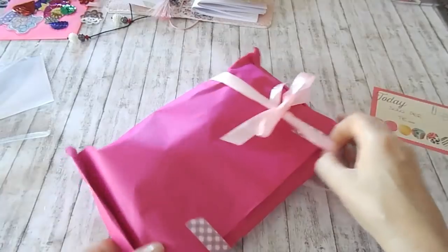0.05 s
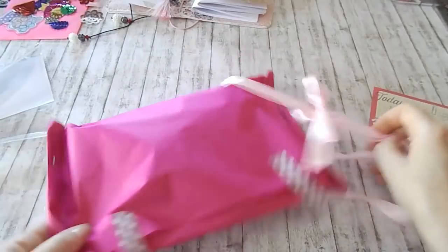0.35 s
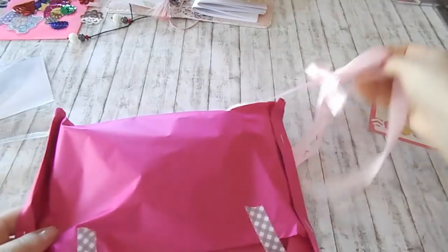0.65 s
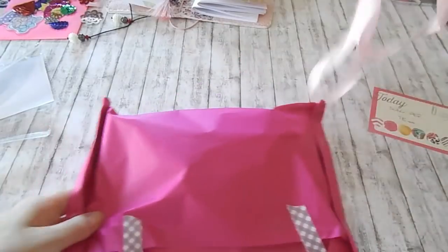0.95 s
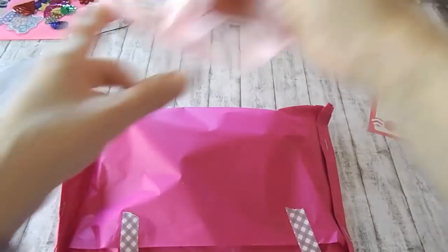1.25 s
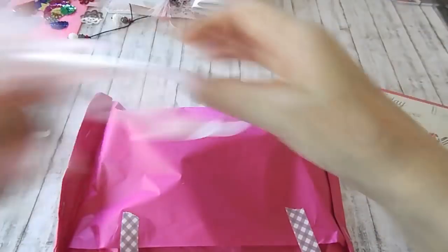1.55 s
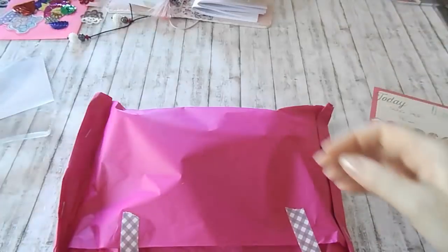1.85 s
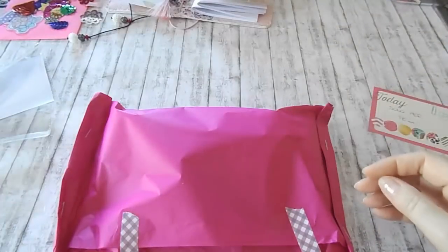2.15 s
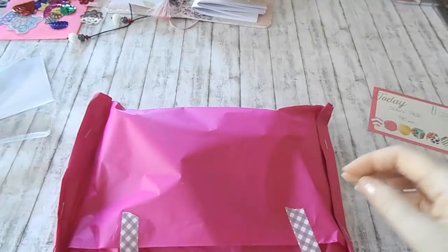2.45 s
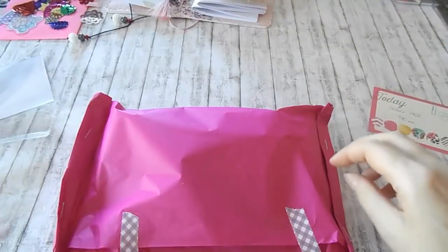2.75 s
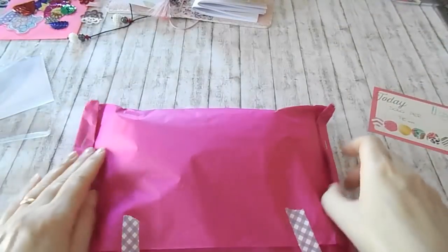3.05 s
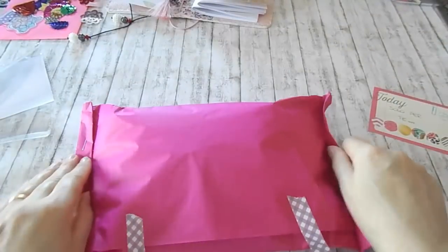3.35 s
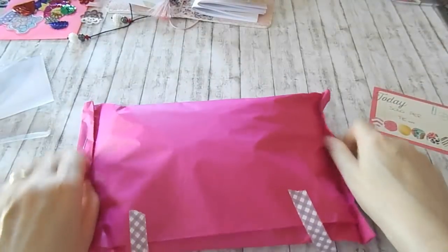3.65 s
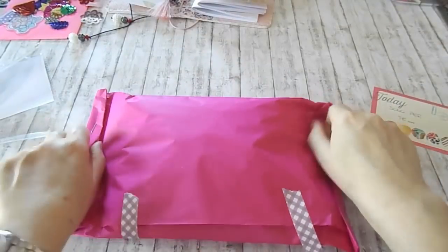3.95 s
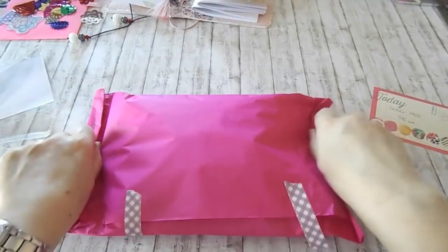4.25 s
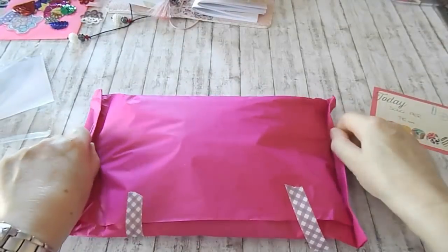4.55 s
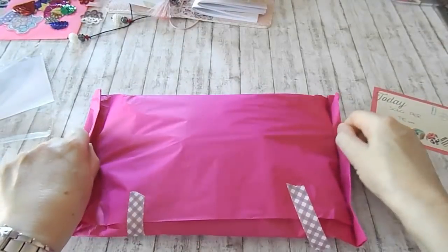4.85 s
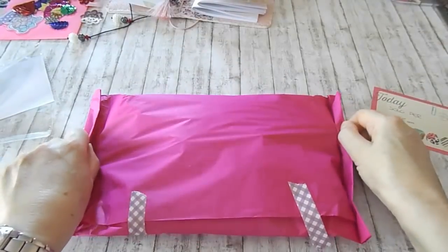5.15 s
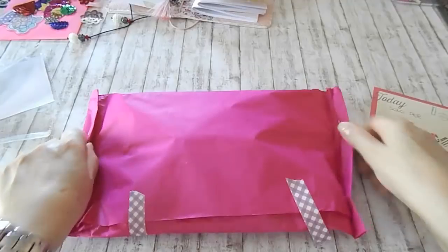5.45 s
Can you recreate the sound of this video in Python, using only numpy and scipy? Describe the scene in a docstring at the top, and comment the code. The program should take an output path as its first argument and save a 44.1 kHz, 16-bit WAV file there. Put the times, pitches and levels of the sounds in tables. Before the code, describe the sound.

A ribbon drags off a rustling paper parcel, then a pause, more crinkling and one loud, sharp snap in a quiet room.

```python
"""Thin, stiff wrapping paper crackles as a ribbon is pulled off a parcel; after a lull, fingers
pick at the taped end until it snaps open. The ribbon drags in tiny slips, the paper buckles in
clusters of crackles and pops, and fingers brush the table and press the parcel against it.
A small quiet room, one microphone close above the table; the placement colours the paper's sound."""
import sys
import numpy as np
from scipy import signal
from scipy.fft import rfft, irfft
from scipy.io import wavfile
from scipy.ndimage import uniform_filter1d

SR = 44100
rng = np.random.default_rng(int(sys.argv[2]) if len(sys.argv) > 2 else 0)


def generate_wav(signal):
    """Clip the signal to [-1, 1] and save it as 16-bit WAV at the path in sys.argv[1]."""
    frames = np.transpose(np.atleast_2d(signal))
    scaled = np.clip(frames, -1, 1) * 32767
    pcm = np.round(scaled).astype(np.int16)
    wavfile.write(sys.argv[1], SR, pcm)


N = 251370
TIME = np.arange(N) / SR
TOP_HZ = 15900

# pulls that drag the ribbon off and gather it: (time [s], length [s], level [dB], body [dB], sheen [dB])
RIBBON_PULLS = [(-.04, 0.11, -38.5, -1.5, 1), (.025, 0.19, -35, -1.5, 2), (.26, 0.14, -36.5, -2.5, -3),
                (.47, 0.14, -45, -2, 3.5), (.655, 0.11, -47, -1, 8), (.735, 0.16, -43.5, -1, 3.5),
                (.935, 0.084, -39, -3.5, -2.5), (1.23, 0.26, -53, -21, 3.5)]
# the loudest creases popping through: (time [s], energy over one millisecond [dB], pitch [Hz])
LOUD_CREASES = [(.176, -28.5, 4120), (.4629, -27.5, 2600), (.4824, -28.5, 2400), (.5282, -30.5, 3840),
                (.5776, -32.5, 3000), (.96, -33, 4260), (1.059, -30, 2300), (1.6919, -46.5, 6100),
                (1.8022, -48, 5600), (2.9125, -35.5, 7000), (2.9723, -28, 8000), (3.0491, -18, 9000),
                (3.1111, -26, 6300), (3.1736, -23, 7000), (3.2512, -25.5, 3780), (3.3209, -30, 3920),
                (3.3517, -27.5, 9400), (3.6264, -25.5, 2530), (3.6843, -19.5, 6600), (3.7893, -25, 5200),
                (3.8279, -18.5, 8000), (3.9663, -22, 8100), (4.0303, -20, 7400), (4.0821, -25, 7360),
                (4.1989, -18.5, 9200), (4.2319, -23, 9700), (4.281, -25, 5100), (4.3028, -24.5, 11000),
                (4.3736, -25.5, 5500), (4.4887, -27, 4700), (4.5137, -29, 4100), (4.5543, -27, 2930),
                (4.6182, -29.5, 3650), (4.6343, -26.5, 2640), (4.684, -25, 6550), (4.6864, -15, 2700),
                (4.9721, -32.5, 5500), (5.195, -17.5, 2100), (5.199, -5, 6800), (5.2096, -17, 3000),
                (5.2126, -15, 5500), (5.3621, -28.5, 9300), (5.4962, -32, 4100), (5.5633, -26, 9100),
                (5.5871, -27, 9300), (5.692, -32, 5900)]
# broad panels flipping with a hollow pop: (time [s], level [dB], ring [Hz], t60 [s])
PANEL_FLIPS = [(0.4623, -31, 1770, 0.0059), (1.0585, -32, 1880, .006), (3.049, -34, 800, .016),
               (3.279, -36, 895, .02), (3.445, -38.5, 870, .014), (3.625, -33, 2290, .012),
               (4.082, -36, 840, .012), (4.554, -32.5, 1010, .01), (4.653, -34, 810, .009),
               (4.686, -17.5, 2280, .01), (5.1987, -3.5, 1060, 0.0036), (5.2122, -16.5, 870, 0.012)]
# fingers brushing over the table: (time [s], level [dB])
BRUSH_ENVELOPE = [(2.505, -88), (2.52, -51), (2.56, -50), (2.61, -57), (2.7, -74)]
# tugs that crumple the wrapping: (time [s], length [s], level [dB], body [dB], crispness [dB])
PAPER_TUGS = [(2.91, 0.15, -37, 2.5, -2), (3.015, 0.087, -33.5, -3, 0), (3.12, 0.099, -43, -1, 7),
              (3.225, 0.11, -34, -1.5, -4), (3.355, 0.11, -36.5, 1, -2), (3.555, 0.027, -39.5, -7, -11),
              (3.6, 0.08, -38.5, -3, 1), (3.78, 0.052, -36, 4.5, -1), (3.893, 0.059, -36.5, -1.5, 0.5),
              (4.068, 0.022, -39, 1, 1), (4.11, 0.053, -45, -3, 4.5), (4.175, .035, -35, -0.5, 0),
              (4.255, 0.075, -33.5, -1, -3.5), (4.36, .02, -41, 2, 4), (4.41, 0.037, -35, -0.5, -3.5),
              (4.503, 0.0095, -42.5, 2, -5), (4.575, 0.1, -44.5, 0, -5.5), (4.812, 0.077, -40, -1.5, -2.5),
              (4.995, 0.031, -46.5, 4, -7), (5.062, 0.028, -37.5, -4.5, -7), (5.26, 0.11, -37.5, 0, -1),
              (5.425, 0.064, -40.5, -3.5, -2), (5.544, 0.017, -32.5, -1.5, -0.5), (5.59, 0.093, -46, -3, 2)]
# fingers pressing the parcel against the table: (time [s], level [dB], t60 [s])
FINGER_PRESSES = [(2.93, -74, .5), (3.04, -73, .7), (3.24, -75, .7), (3.79, -74, .25), (3.955, -71, .1),
                  (4.16, -81, .5), (4.28, -75, .3)]
# the flap jerking loose: (time [s], level [dB], rise [s], t60 [s], ring [Hz], ring [dB], air puff [dB])
FLAP_SNAPS = [(4.6825, -23.5, 0.0026, 0.2, 2290, -2.5, -64), (5.1933, -22.5, .00062, 0.018, 2080, 7, -56),
              (5.1988, -20, 0.00059, 0.24, 2040, -4, -34), (5.2082, -14.5, .0033, 0.069, 1900, -4, -46)]
# narrow peaks from room, table and microphone placement: (frequency [Hz], width [Hz], gain [dB])
ROOM_TABLE_PEAKS = [(500, 28, -7.5), (633, 31, -10.5), (826, 30, -6), (1030, 24, -18), (1128, 24, -30),
                    (1240, 12, -13), (1340, 64, -13.5), (2080, 52, -19.5), (2700, 54, -19)]
# tone colour of ribbon, room air, finger brush, paper and flap: (frequency [Hz], gain [dB])
RIBBON_EQ = [(71, -70), (120, -31), (157, -8), (188, -23.5), (327, -12.5), (362, -10), (546, -10),
             (949, 0.5), (1320, -4.5), (2930, -1.5), (4590, -4.5), (8480, -5), (15000, -7), (16000, -21)]
ROOM_EQ = [(18, -63), (30, -38), (86, -17.5), (134, -25), (157, -15.5), (189, -12.5), (295, -8.5),
           (364, -8), (616, -2.5), (721, -4.5), (1100, -1.5), (1350, -10.5), (1630, -10), (1760, -14),
           (16000, -22.5)]
BRUSH_EQ = [(200, -18), (900, 12), (1600, 2.5), (3200, 3), (6000, 1), (10000, -5), (16000, -13)]
PAPER_EQ = [(59, -74), (100, -32), (185, -29), (266, -18.5), (415, -13), (452, -12), (535, -11), (836, 0),
            (1230, -3), (2860, -1.5), (4380, -4.5), (5900, -4), (14700, -6.5), (16000, -12)]
SNAP_EQ = [(100, -36), (250, -24), (380, -9.5), (600, -4), (1000, 0.5), (2500, -18.5), (4500, -4),
           (6500, -2), (12000, -4.5), (16000, -8)]


def undb(db):
    """Decibels to gain."""
    return 10 ** (np.asarray(db) / 20)


def unit(x):
    """Scale to rms 1."""
    return x / np.sqrt(np.mean(x ** 2))


def add(out, s, x):
    """Mix x into out from time s on."""
    i = int(s * SR)
    out[i:i + len(x)] += x[:N - i]


def fade(t, t60):
    """Exponential decay by 60 dB in t60."""
    return np.exp(-np.log(1000) * t / t60)


def band(x, hz, width_hz, passes=1):
    """Two-pole resonance with gain 1 at its centre; more passes steepen the skirts."""
    w = 2 * np.pi * min(hz, SR * .45) / SR
    a = np.sin(w) * width_hz / hz / 2
    for _ in range(passes):
        x = signal.lfilter([a, 0, -a], [1 + a, -2 * np.cos(w), 1 - a], x)
    return x


def colour(x, eq, size=2048):
    """Minimum-phase EQ, so that attacks stay sharp."""
    hz, db = np.transpose(eq)
    bins_hz = np.maximum(np.arange(size // 2 + 1) * SR / size, 1)
    gain = undb(np.interp(np.log(bins_hz), np.log(hz), db))
    cepstrum = irfft(np.log(gain))
    cepstrum[1:size // 2] *= 2
    cepstrum[size // 2 + 1:] = 0
    return signal.fftconvolve(x, irfft(np.exp(rfft(cepstrum))))[:len(x)]


def diffuse(x, t60, delay_s, dull_hz, size=22050):
    """A dense reverb tail that starts after a delay and is softer in the treble."""
    t = np.arange(size) / SR
    tail = rng.standard_normal(size) * fade(t, t60) * (t > delay_s)
    tail = signal.lfilter(*signal.butter(1, dull_hz, fs=SR), tail / np.linalg.norm(tail))
    return signal.fftconvolve(x, tail)[:N]


def wander(rate_hz):
    """Glides from one random value to the next; spread near 1."""
    hold = int(SR / rate_hz)
    steps = np.repeat(rng.standard_normal(N // hold + 1), hold)[:N]
    return np.sqrt(3 / 2) * uniform_filter1d(steps, hold)


def stroke(s, length_s, attack_s, release_t60, sag_db_per_s=0):
    """Envelope of one hand move: it takes hold, eases off while it lasts, and lets go."""
    out, live = np.zeros(N), (TIME > s) & (TIME < s + 1)
    t = TIME[live] - s
    sag = undb(-sag_db_per_s * np.minimum(t, length_s))
    release = fade(np.maximum(t - length_s, 0), release_t60)
    out[live] = np.minimum(t / attack_s, 1) * sag * release
    return out


def hand_motion(moves, swell_share, release_t60, sag_db_per_s, rest=0):
    """Level, body and top curves in dB; long moves swell more slowly, the strongest sets the colour."""
    power = np.array([stroke(s, length_s, swell_share * length_s, release_t60, sag_db_per_s) * undb(db)
                      for s, length_s, db, _, _ in moves]) ** 2
    total = power.sum(0) + rest ** 2 + 1e-14
    body_db, top_db = np.transpose(moves)[-2:] @ power / total
    return 10 * np.log10(total), body_db, top_db


def crackle(per_s, spread_db, cluster_db, cluster_hz, octaves, rub_db=-0.5, window=2200):
    """Clusters of tiny slips, each with its own size and pitch, over smooth rubbing; level held even."""
    chance, strength, pitch, sign = rng.random((4, N))
    size_db = -spread_db * np.log(np.maximum(strength, .04))
    slips = (chance < per_s / SR) * undb(size_db) * np.sign(sign - .5)
    centres_hz = np.geomspace(250, 15000, 11)
    slip_octave = np.log2(centres_hz[0]) + pitch * np.log2(TOP_HZ * 2 / centres_hz[0])
    ticks = np.zeros(N)
    for hz in centres_hz:
        share = np.exp(-.5 * ((slip_octave - np.log2(hz)) / octaves) ** 2)
        ticks += band(slips * share * rng.choice([-1, 1], N), hz, hz, passes=2)
    rubbing = undb(rub_db) * rng.standard_normal(N)
    texture = (unit(ticks) + rubbing) * undb(cluster_db * wander(cluster_hz))
    local_power = uniform_filter1d(uniform_filter1d(texture ** 2, window), window)
    return texture / np.sqrt(local_power)


def rustle(slips, eq, motion, body_hz, crisp_hz):
    """Slips played by a hand: pressing brings out the body, light contact the top."""
    level_db, body_db, top_db = motion
    full = unit(colour(slips, eq))
    body = signal.sosfiltfilt(signal.butter(2, body_hz, fs=SR, output="sos"), full)
    top = signal.sosfiltfilt(signal.butter(2, crisp_hz, "high", fs=SR, output="sos"), full)
    mids = full - body - top
    return undb(level_db) * (mids + body * undb(body_db) + top * undb(top_db))


def ribbon(pulling, zip_hz=3100, zip_width_hz=1700):
    """Satin slides over paper in tiny slips, and zips taut over an edge as its end comes free."""
    slips = crackle(per_s=5000, spread_db=5, cluster_db=1.35, cluster_hz=230, octaves=0.71)
    taut = undb(-44.5) * stroke(s=1, length_s=0.023, attack_s=0.014, release_t60=0.072)
    edge_zip = unit(band(slips, zip_hz, zip_width_hz, passes=2)) * taut
    return edge_zip + undb(1.84) * rustle(slips, RIBBON_EQ, pulling, body_hz=1340, crisp_hz=5500)


def room_tone(air_db=-57.5, hum_hz=158, hum_db=-86):
    """A soft bed of house air with a faint wavering hum."""
    air = unit(colour(rng.standard_normal(N), ROOM_EQ)) * undb(air_db + 0.19 * wander(4.6))
    hum = unit(np.sin(2 * np.pi * hum_hz * TIME)) * undb(hum_db + 2 * wander(4.2))
    return air + hum


def small_creases(effort_db, per_s=30, over_db=4.5, scatter_db=2.5, hz=7000, octaves=0.59, count=400):
    """Cues for creases that give way at random, as strong as the hands are working."""
    times = np.cumsum(rng.exponential(1 / per_s, count))
    return [(s, effort_db[int(s * SR)] + over_db + scatter_db * strength, hz * 2 ** (octaves * pitch))
            for s, (strength, pitch) in zip(times, rng.standard_normal((count, 2)))
            if .01 < s < TIME[-1]]


def crease_pops(creases, lead_t60=0.0014, slip_t60=0.001, ragged=0.7, splash_db=-9, size=400):
    """A crease creaks, flips in one ragged jump and rings its own small facet for a cycle or two."""
    out, t = np.zeros(N), np.arange(-size // 4, size) / SR
    creak = fade(np.abs(t), np.where(t < 0, lead_t60, slip_t60))
    for (s, db, hz), noise in zip(creases, rng.standard_normal((size, len(t)))):
        jump = (t == 0) + ragged * noise * creak
        pop = band(jump, hz, hz, passes=2) + undb(splash_db) * band(jump, 2 * hz, 4 * hz)
        energy = np.sum(pop ** 2) / (SR / 1000)  # over one millisecond
        add(out, s + t[0], pop * undb(db) / np.sqrt(energy))
    return out


def panel_pops(size=2000):
    """A larger panel flips and rings a few cycles at its own pitch."""
    out, t = np.zeros(N), np.arange(size) / SR
    for s, db, hz, t60 in PANEL_FLIPS:
        add(out, s, undb(db) * np.sqrt(2) * np.cos(2 * np.pi * hz * t) * fade(t, t60))
    return out


def finger_brush():
    """Skin slides briefly over the table top."""
    level_db = np.interp(TIME, *np.transpose(BRUSH_ENVELOPE))
    return unit(colour(rng.standard_normal(N), BRUSH_EQ)) * undb(level_db)


def wrapping(crumpling):
    """The paper buckles in sparser, more uneven steps than the ribbon's slips."""
    slips = crackle(per_s=2000, spread_db=5.5, cluster_db=2, cluster_hz=150, octaves=0.52)
    return undb(1.97) * rustle(slips, PAPER_EQ, crumpling, body_hz=1380, crisp_hz=5300)


def table_thuds(thud_hz=68, width_hz=45):
    """Each push of the fingers leaves a soft low rumble in the table."""
    force = sum(undb(db) * (TIME > s) * fade(np.abs(TIME - s), t60) for s, db, t60 in FINGER_PRESSES)
    rumble = band(rng.standard_normal(N), thud_hz, width_hz)
    return force * unit(band(rumble, thud_hz, 2 * width_hz))


def flap_snaps(puff_hz=90, puff_width_hz=260, flutter_db=3, size=11025):
    """The freed flap shudders in a dense burst, rings, and pushes out a puff of air."""
    out, t = np.zeros(N), np.arange(size) / SR
    flutter = undb(flutter_db * wander(500))[:size]
    puff = band(t == 0, puff_hz, puff_width_hz)
    for s, db, rise_s, t60, ring_hz, ring_db, puff_db in FLAP_SNAPS:
        shudder = unit(colour(rng.standard_normal(size), SNAP_EQ) * flutter)
        ring = undb(ring_db) * unit(band(rng.standard_normal(size), ring_hz, ring_hz * 1.7, passes=2))
        envelope = np.minimum(t / rise_s, 1) * fade(np.maximum(t - rise_s, 0), t60)
        add(out, s, undb(db) * (shudder + ring) * envelope + undb(puff_db) * puff / puff.max())
    return out


def scene(ribbon_strain_db=-8, grip_s=2.911, settle_db_per_s=1.5, sheet_low_hz=330):
    """Hands drive rustle and creases; pops spread through the sheet; room and table colour the paper."""
    pulling = hand_motion(RIBBON_PULLS, swell_share=0.23, release_t60=0.46, sag_db_per_s=9)
    # between tugs the resting hands keep the paper stirring, less and less as the grip settles
    grip = undb(-46.5 - settle_db_per_s * (TIME - grip_s)) * (TIME > grip_s)
    crumpling = hand_motion(PAPER_TUGS, swell_share=0.31, release_t60=0.26, sag_db_per_s=5.5, rest=grip)
    effort_db = np.maximum(pulling[0] + ribbon_strain_db, crumpling[0])
    pops = crease_pops(LOUD_CREASES + small_creases(effort_db)) + panel_pops()
    pops = signal.lfilter(*signal.butter(2, sheet_low_hz, "high", fs=SR), pops)
    sheet = pops + undb(-5.5) * diffuse(pops, t60=0.0064, delay_s=.0004, dull_hz=6000)
    paper = sheet + ribbon(pulling) + wrapping(crumpling) + flap_snaps()
    placement_peaks = sum(undb(db) * band(paper, hz, width_hz) for hz, width_hz, db in ROOM_TABLE_PEAKS)
    direct = undb(-1.04) * (paper + placement_peaks) + finger_brush()
    reverb = undb(-10.5) * diffuse(direct, t60=0.33, delay_s=0.0073, dull_hz=5140)
    return (direct + reverb + table_thuds() + room_tone())[None]


def record(dry):
    """The microphone overloads on the hardest snap; the top is cut steeply."""
    high_cut = signal.ellip(10, .2, 70, TOP_HZ, fs=SR, output="sos")
    return signal.sosfilt(high_cut, np.clip(dry, -1, 1))


dry = scene()
out = record(dry)
generate_wav(out)
```